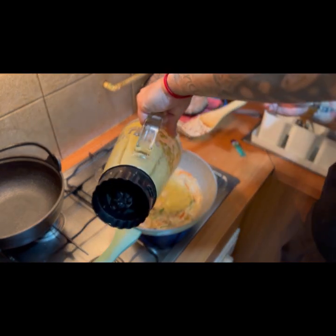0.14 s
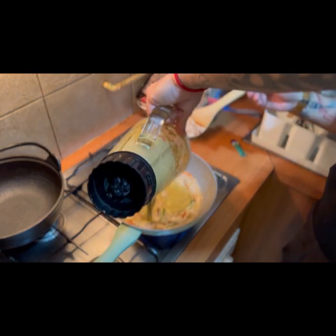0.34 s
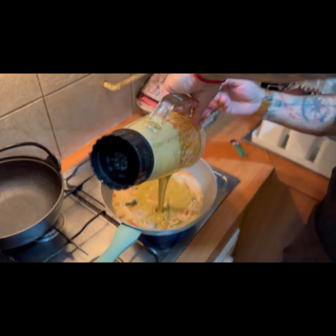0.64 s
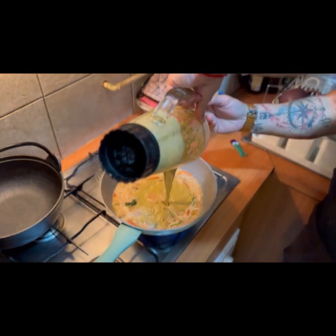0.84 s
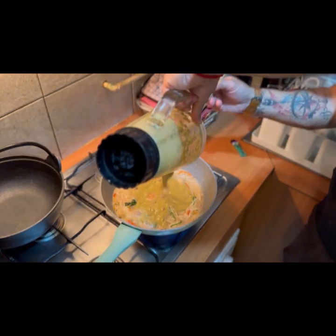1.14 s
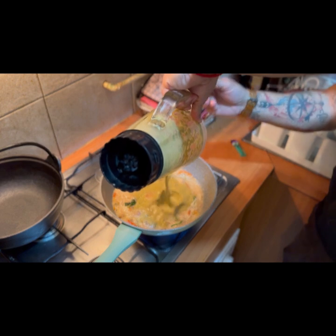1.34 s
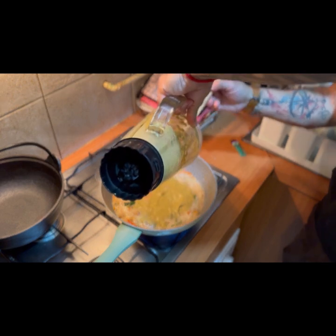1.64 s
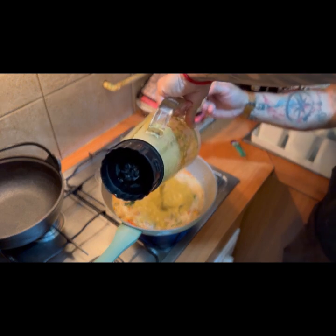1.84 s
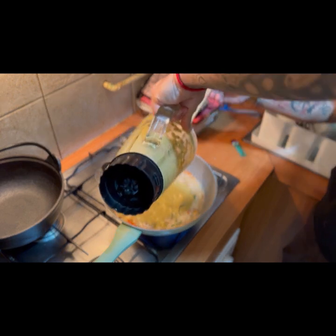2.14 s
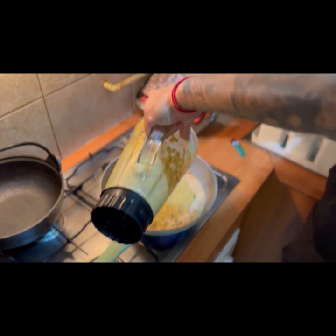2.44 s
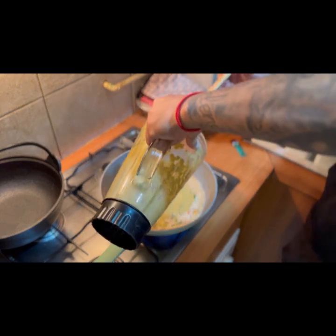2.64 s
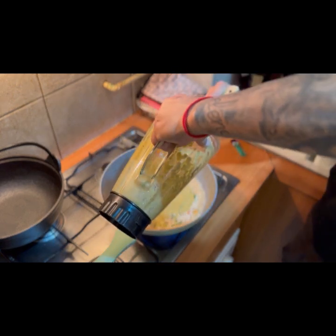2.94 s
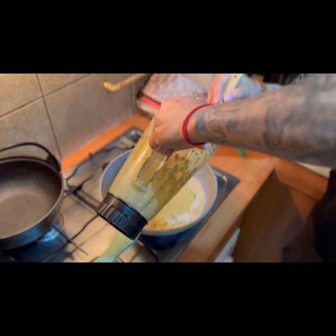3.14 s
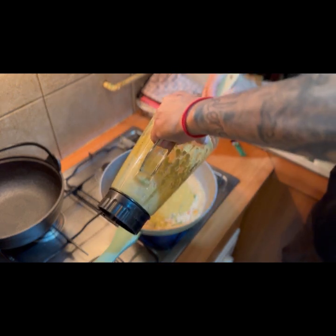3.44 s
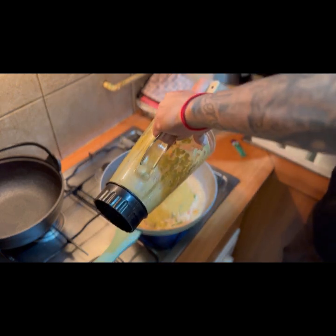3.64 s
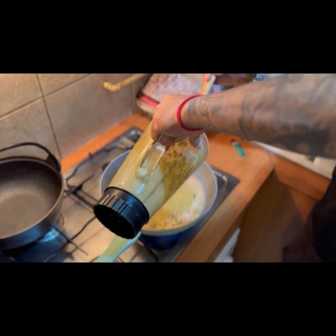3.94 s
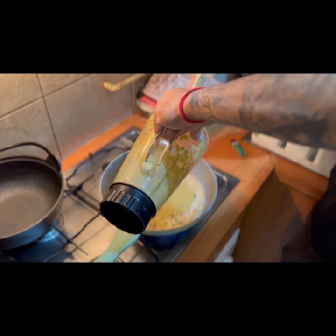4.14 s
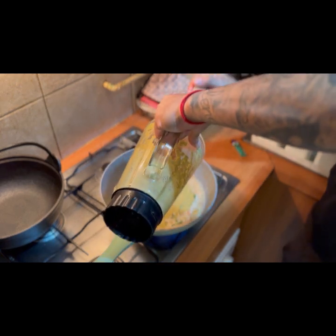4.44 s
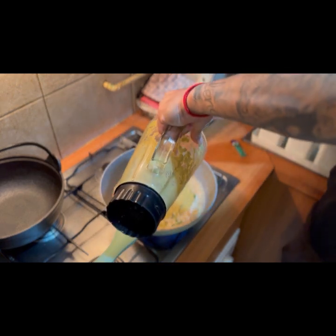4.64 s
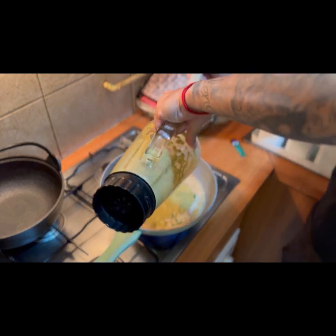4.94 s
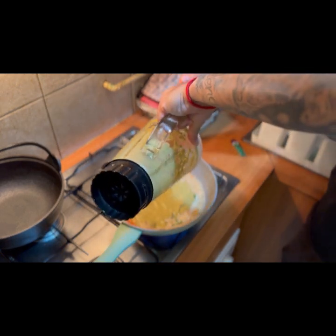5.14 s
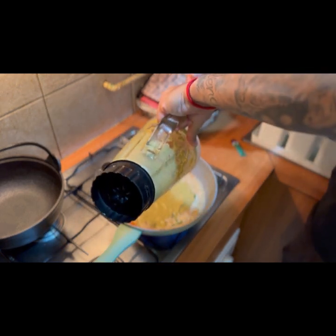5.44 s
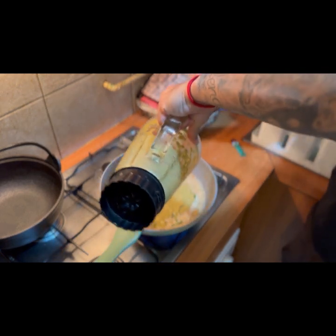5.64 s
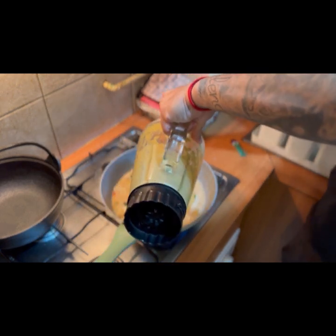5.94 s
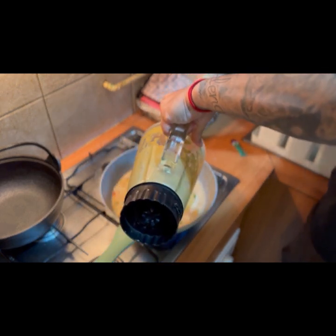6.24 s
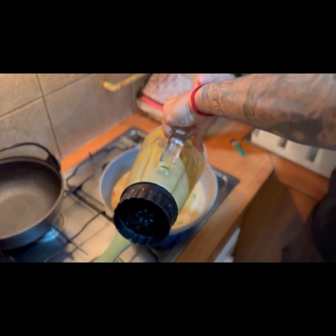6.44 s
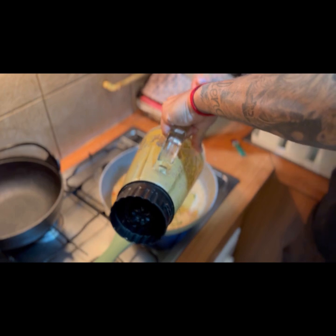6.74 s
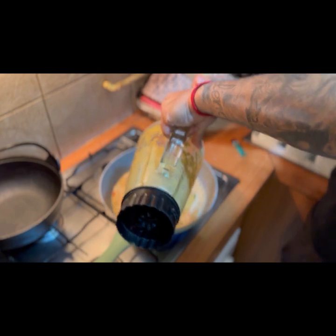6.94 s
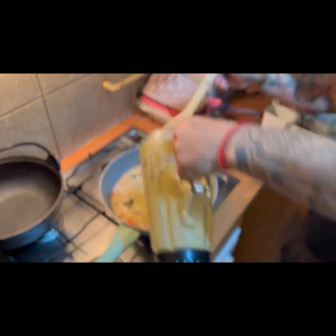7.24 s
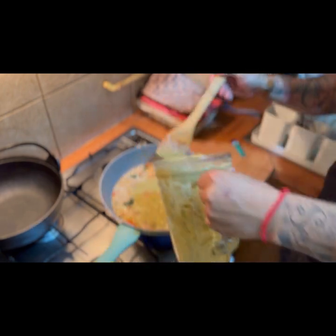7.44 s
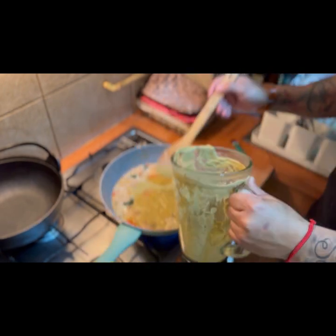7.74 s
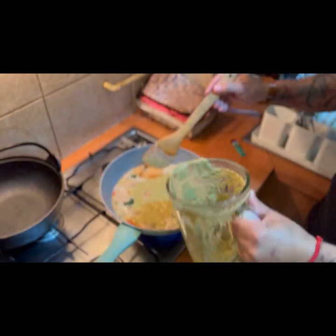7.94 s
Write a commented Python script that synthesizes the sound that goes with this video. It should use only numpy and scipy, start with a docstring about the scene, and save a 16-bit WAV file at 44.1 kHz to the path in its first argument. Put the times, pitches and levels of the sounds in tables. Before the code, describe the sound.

Close to a stereo microphone, a wooden spoon taps and rattles around a glass blender jar coated in thick sauce. The knocks come in irregular bunches, hollow and briefly ringing, brighter in the middle and boomier later, then die away near the end. Underneath, a pan hisses quietly with a few tiny spits and a fridge hums. The small tiled kitchen adds a short echo.

```python
"""A pan simmers softly and a fridge hums near a stereo microphone in a small tiled kitchen.
Half a second in, a wooden spoon starts to knock and bounce inside a sauce-coated glass jar.
Each knock booms in the jar's hollow and rings its sauce-damped glass, with a clack, a crack and
a thump at the contact. The tiles send a short echo back, and the pan spits three times."""
import sys
import numpy as np
from scipy import signal
from scipy.fft import rfft, irfft
from scipy.io import wavfile
from scipy.ndimage import uniform_filter1d

SR = 44100
rng = np.random.default_rng(int(sys.argv[2]) if len(sys.argv) > 2 else 0)


def log_audio(samples):
    """Write samples as a 16-bit WAV file to the path given in sys.argv[1]."""
    # one column per channel
    frames = np.atleast_2d(samples).T
    # limit to full scale, then quantise
    limited = np.clip(frames, -1, 1)
    pcm = np.round(limited * 32767).astype(np.int16)
    wavfile.write(sys.argv[1], SR, pcm)


N = 356627

def gain_of(db):
    return 10 ** (np.asarray(db) / 20)

def at_hz(curve, hz):
    f, value = np.transpose(curve)
    return np.interp(np.log(hz + 1), np.log(f + 1), value)

def at_time(curve, s):
    return np.interp(s, *np.transpose(curve))

def add(mix, s, sound):
    part = mix[:, round(s * SR):][:, :sound.shape[1]]
    part += sound[:, :part.shape[1]]

def coloured(x, spectrum):
    size = x.shape[-1]
    return irfft(rfft(x) * gain_of(at_hz(spectrum, np.fft.rfftfreq(size, 1 / SR))), size)

def topped(x, db):
    """Scales a sound so that its loudest 4 ms have this level."""
    return gain_of(db) * x / np.sqrt(uniform_filter1d((x ** 2).mean(0), size=176).max() + 1e-20)

def burst(t, spectrum, decay_s, shared):
    """A short puff of coloured noise, partly shared by both sides of the microphone."""
    noise = rng.standard_normal((3, len(t)))
    envelope = np.exp(-(t / decay_s) ** 1.09) * (1 - np.exp(-(t / 0.0017) ** 2))
    return coloured(noise[:2] + shared * noise[2], spectrum) * envelope

# Pan and room tone at the microphone. Each row: frequency in Hz, relative level in dB.
SIMMER_SPECTRUM = [(35, -36.5), (60, -11), (76, -19.5), (149, -0.5), (297, -3), (346, -8), (705, -3.5),
                   (895, -10), (1130, -5), (1500, -11.5), (2000, -6.5), (2450, -8.5), (3050, -13),
                   (4500, -15.5), (5200, -23), (10500, -45.5), (13700, -69.5), (22000, -120)]
# The swell of the hiss. Each row: time in seconds, gain in dB.
SIMMER_SWELL = [(0.0, 1.5), (0.85, 2), (1.93, 0), (3.2, -0.5), (3.42, 1), (3.78, 0), (7.18, -1), (8.09, 0)]
# Stereo width. Each row: frequency in Hz, left-right correlation.
SIMMER_LIKENESS = [(60, 0.67), (140, 0.96), (330, 0.9), (780, 0.16), (1830, -0.047), (4290, -0.083),
                   (10100, -0.18)]
# The lean to the left. Each row: frequency in Hz, left minus right in dB.
SIMMER_LEAN = [(60, 8.5), (140, 0.5), (330, 1.2), (780, 1), (1830, 5.1), (4290, 2.9), (10100, 2.7)]

def simmer(level_db=-55):
    """Room tone and the soft hiss of the pan: noise with drifting patches."""
    frames, hz = N // 256 + 5, np.fft.rfftfreq(1024, 1 / SR)
    a, b, c, d, patches = rng.standard_normal((frames, 513, 5)).T
    left, unrelated = a + 1j * b, c + 1j * d
    patches = uniform_filter1d(uniform_filter1d(patches, size=10, axis=0), size=12, axis=1)
    patches /= np.sqrt(np.mean(patches ** 2))
    swell_db = at_time(SIMMER_SWELL, np.arange(frames) * 256 / SR)
    likeness = at_hz(SIMMER_LIKENESS, hz)[:, None]
    spectra = np.array([left, likeness * left + np.sqrt(1 - likeness ** 2) * unrelated])
    hiss_share = np.clip(hz / 1500, 0, 1)[:, None]  # the low room tone barely swells
    spectra *= gain_of(at_hz(SIMMER_SPECTRUM, hz)[:, None] + 1.3 * patches + hiss_share * swell_db)
    spectra *= gain_of(np.array([.5, -.5])[:, None, None] * at_hz(SIMMER_LEAN, hz)[:, None])
    sound = signal.istft(spectra, nperseg=1024, noverlap=768)[1][:, :N]
    return gain_of(level_db) * sound / np.sqrt(np.mean(sound.mean(0) ** 2))

# The fridge nearby, dead centre. Each row: harmonic number, rms level in dB about which it wavers.
HUM_HARMONICS = [(1, -73), (3, -70), (4, -76), (5, -76), (6, -77), (10, -77), (12, -80), (14, -80)]

def fridge(hum_hz=49.3):
    """Steady tones of a compressor, the upper ones wavering in level."""
    t = np.arange(N) / SR
    hum = np.zeros(N)
    for harmonic, db in HUM_HARMONICS:
        hz = harmonic * hum_hz
        waver_db = .012 * hz * np.interp(t, np.linspace(0, t[-1], 90), rng.uniform(-1, 1, 90))
        hum += np.sqrt(2) * gain_of(db + waver_db) * np.sin(2 * np.pi * (hz * t + rng.random()))
    return hum

# The jar's hollow among the tiles. Each row: frequency in Hz, t60 in seconds, left gain, right gain.
# The sign tells which side of a node the microphone is on.
HOLLOW_MODES = [(388, 0.28, 0.078, 0.041), (432.4, 0.17, -0.14, -0.32), (457.3, 0.36, 0.056, 0.2),
                (462.3, 0.11, 0.4, 0.92), (486, 0.39, 0.15, 0.036), (517.7, 0.15, 0.21, -0.42),
                (554.2, 0.17, -0.24, -0.016)]
# The jar tilts. Each row: time in seconds, pitch in Hz that weights the modes.
HOLLOW_PITCH = [(0.5, 489), (1.5, 457), (3.0, 464.6), (3.6, 467), (4.2, 451), (5.5, 455.5), (7.0, 439)]

def boom(t, s):
    """The hollow's modes start together; opposite signs make the boom swell, hold and then beat."""
    hz, t60, *sides = (c[:, None] for c in np.transpose(HOLLOW_MODES))
    share, slip = rng.standard_normal((2, len(HOLLOW_MODES), 1))
    tilt_db = 1.35 * np.log2(hz / 457) * (at_time(HOLLOW_PITCH, s) - 457)
    waves = gain_of(tilt_db + 1.5 * share - 60 * t / t60) * np.sin(2 * np.pi * hz * t + .3 * slip)
    return np.sum(sides * waves, axis=1) * (1 - np.exp(-(t / 0.0012) ** 2))

# The glass at the microphone. Each row: frequency in Hz, relative level in dB, t60 in seconds,
# left minus right in dB, lead of the left side in radians.
BELLY_MODES = [(1020, 0, .1, 2, .5), (1070, 0, .13, 2, 1), (1125, 0, .12, 1, -1), (1168, 0, .21, -2, 2),
               (1210, -1, .1, 0, 2), (1280, -2, .1, 1, -1), (1360, -3, .09, 1, 2)]
WALL_MODES = [(1522, 0, .1, 0, 1), (1670, 0, .08, 0, -2), (1720, 0, .16, 0, -1), (1775, 0, .14, 0, -2),
              (1850, 0, .12, 0, 1), (1900, 0, .16, 2, -1), (1940, 0, .14, -1, .4), (2105, 0, .11, 0, 2),
              (2278, 0, .12, 0, .3), (2480, 0, .12, 0, -2)]
RIM_MODES = [(2785, 0, .21, 0, 2), (2830, -2, .12, 1, .6), (3070, -3, .1, 0, -1), (3160, -3, .1, 0, 2),
             (3360, -1, .13, 1, -2)]
# The rim rings higher with the spoon near the tipped-up mouth. Each row: time in seconds, pitch in Hz.
RIM_PITCH = [(2.6, 2800), (2.8, 3340), (3.05, 3150), (3.65, 3180), (3.9, 2770)]

def glass(t, s, belly_db, belly_hz, wall_db, wall_hz, rim_db, loss_db_per_s):
    """Belly, wall and rim ring at once, damped by the sauce on them."""
    damping = gain_of(-loss_db_per_s * t)
    belly = damping * ring(BELLY_MODES, t, belly_hz, db_per_octave=230, rise_s=0.00048)
    wall = damping * ring(WALL_MODES, t, wall_hz, db_per_octave=240, rise_s=0.00071)
    rim = damping * ring(RIM_MODES, t, at_time(RIM_PITCH, s), db_per_octave=140, rise_s=0.00044)
    return topped(belly, belly_db) + topped(wall, wall_db) + topped(rim, rim_db)

def ring(modes, t, struck_hz, db_per_octave, rise_s):
    """Dying modes; those near the pitch of the struck spot ring most."""
    hz, db, t60, pan_db, lead = (c[:, None] for c in np.transpose(modes))
    share, start, slip = rng.standard_normal((3, len(modes), 1))  # no two blows are alike
    db = db - np.minimum(db_per_octave * abs(np.log2(hz / struck_hz)), 17) + 2 * share
    fade = gain_of(db - 60 * t / t60) * (1 - np.exp(-(t / rise_s) ** 2))
    phase = 2 * np.pi * hz * t + start
    lead = lead + 0.85 * slip
    sides = [gain_of(side * pan_db) * fade * np.sin(phase + side * lead) for side in (.5, -.5)]
    return np.sum(sides, axis=1)

# The spoon's dull wood. Each row: frequency in Hz, relative level in dB.
CLACK_SPECTRUM = [(600, -36), (900, 4.5), (1300, 8.5), (1600, 4), (2500, 13), (3300, 6.5), (4200, -56)]

def clack(t, belly_db, wall_db, rim_db, wood_db):
    """The wood's short knock follows the colour and strength of the blow."""
    tint = [(1150, belly_db), (2000, wall_db), (3000, rim_db)]
    corners_hz = sorted(hz for hz, _ in [*CLACK_SPECTRUM, *tint])
    spectrum = [(hz, at_hz(CLACK_SPECTRUM, hz) + at_hz(tint, hz)) for hz in corners_hz]
    glass_db = 10 * np.log10(np.mean(gain_of([belly_db, wall_db, rim_db]) ** 2))
    return topped(burst(t, spectrum, decay_s=0.014, shared=.7), glass_db + wood_db)

# Wood on glass, and its thin top. Each row: frequency in Hz, relative level in dB.
CRACK_SPECTRUM = [(2800, -18.5), (3500, 3.5), (4200, 1), (5000, -3.5), (6200, -19), (7200, -64)]
SHEEN_SPECTRUM = [(5800, -28.5), (6600, 5), (7500, -5.5), (9000, -12), (10500, -34.5)]
# Hardness of the contact. Each row: time in seconds, crack over the blow's wall level in dB.
HARDNESS = [(0.5, -15.5), (2.0, -20), (3.0, -13.5), (3.7, -13), (4.05, -14), (4.3, -14), (5.2, -22.5),
            (7.0, -22.5)]

def crack(t, s, wall_db):
    """Wood meets glass; harder cracks are brighter."""
    crack_db = wall_db + at_time(HARDNESS, s)
    sheen_db = crack_db - 22 + 0.6 * (crack_db + 30.5)
    body = topped(burst(t, CRACK_SPECTRUM, decay_s=0.019, shared=0.47), crack_db)
    return body + topped(burst(t, SHEEN_SPECTRUM, decay_s=0.013, shared=0.38), sheen_db)

# The thump, centred on the microphone. Each row: frequency in Hz, relative level in dB.
THUMP_SPECTRUM = [(100, -35.5), (160, -1), (300, 10), (600, 18.5), (850, 15), (1200, -42.5)]

def thump(t, boom_db, belly_db, wood_db):
    """The dull push at contact; woody blows push more."""
    level_db = (boom_db + belly_db) / 2 - 9 + 0.29 * wood_db
    return topped(burst(t, THUMP_SPECTRUM, decay_s=0.0065, shared=11.0), level_db)

# Firm blows in the jar. Each row: start in seconds, boom in dB, belly in dB, its pitch in Hz, wall in dB,
# its pitch in Hz, rim in dB, wood over ring in dB. Glass levels are before the blend with the wood.
KNOCKS = [(0.5343, -44.5, -42, 980, -69.5, 1500, -72, 14), (0.6657, -39, -43, 1100, -32.5, 1880, -51, -17),
          (0.8385, -36.5, -20, 1147, -21.5, 1913, -31, 2.5), (0.9412, -44, -35, 1124, -51, 1900, -60, -12),
          (1.042, -28, -28.5, 1144, -37.5, 2550, -48, 2.5), (1.3668, -48.5, -37, 980, -63, 1860, -72, 10),
          (1.4199, -28, -29.5, 1110, -44.5, 2310, -49, 4), (1.4435, -25, -34, 1100, -34, 2000, -46, -1),
          (1.8918, -35.5, -35, 1134, -42, 1670, -68, -5), (1.9088, -27.5, -34, 1150, -37.5, 1720, -50, 3.5),
          (2.8197, -41.5, -36.5, 1066, -36, 2050, -38, 0.5),
          (2.9666, -40, -29.5, 1360, -28.5, 1773, -40, -0.5),
          (3.033, -44.5, -32, 1350, -26.5, 1707, -31, -1), (3.0692, -27, -22, 1190, -12.5, 2320, -23, 7),
          (3.0822, -55, -30.5, 1045, -36, 2170, -37, -4), (3.27, -48, -34, 1054, -28, 1768, -44, -5),
          (3.3157, -64, -47, 1000, -42, 1850, -60, -8), (3.3338, -29.5, -30, 1173, -30, 1970, -33, -1),
          (3.3432, -37, -22, 1152, -24.5, 1730, -33, 4.5), (3.3825, -41, -30, 1120, -24, 2430, -33, 8.5),
          (3.475, -35, -32, 1090, -42.5, 2230, -49.5, 1), (3.5349, -46.5, -41, 1160, -57, 2150, -71, 3),
          (3.6142, -29.5, -30, 1290, -33.5, 1800, -35, -4.5), (3.6222, -30, -34, 1190, -36, 1740, -41, -10),
          (3.6547, -33, -22, 1216, -17.5, 1795, -29, 3), (3.759, -39.5, -39, 1115, -42, 1760, -67, -7),
          (4.041, -36.5, -33.5, 1090, -33.5, 1682, -46, -7), (4.091, -35, -25.5, 1020, -32, 2555, -45, 2.5),
          (4.1702, -59, -43, 1360, -46.5, 1700, -60, -5), (4.2944, -31, -39.5, 1085, -44.5, 1940, -60, 0.5),
          (4.5064, -33, -41, 1014, -39, 1850, -51, -4), (4.5495, -28, -38, 1360, -31, 1880, -53, -4),
          (4.5642, -26, -21.5, 1248, -29.5, 1956, -36, -0.5), (5.1378, -24, -29, 1220, -30, 1720, -69, 5),
          (5.1859, -24, -42, 1116, -36, 1670, -55, -3), (5.4779, -41, -22.5, 1146, -30.5, 1955, -33, -0.5),
          (5.4877, -44, -28, 1058, -43, 2090, -45, -4), (5.8374, -22.5, -41, 1110, -33, 1980, -52.5, 2),
          (6.2065, -19, -24.5, 1140, -23, 1913, -41, 2), (6.4942, -37, -22, 1142, -27.5, 1636, -31.5, -4),
          (6.7967, -44.5, -24.5, 1164, -35, 1633, -33, -2.5), (8.059, -65, -48, 1130, -51, 1640, -75, -3)]
# Soft rebounds through the sauce, mostly boom. Each row: start in seconds, boom in dB.
REBOUNDS = [(0.7707, -48.5), (1.1109, -43.5), (1.9801, -43.5), (2.0669, -37.5), (4.365, -50), (4.7318, -45),
            (4.8555, -36.5), (4.9092, -49.5), (5.257, -37.5), (5.3133, -35.5), (5.561, -35.5),
            (5.6113, -38.5), (5.9066, -39), (5.9781, -34.5), (6.2732, -33.5), (6.3127, -36.5),
            (6.5701, -40), (6.5997, -32), (6.6712, -50), (6.9286, -48.5), (6.9624, -47.5)]

def spoon_in_jar():
    """Every blow of the spoon, as two tracks: the hollow's booms and the strikes on the glass."""
    booms, strikes = np.zeros((2, 2, N))
    t = np.arange(9000) / SR
    soft = [(s, db, db - 21.5, 1139, db - 25, 2000, db - 30.5, -5.5) for s, db in REBOUNDS]
    for s, boom_db, belly_db, belly_hz, wall_db, wall_hz, rim_db, wood_db in KNOCKS + soft:
        # Sauce on the struck spot: boomy or woody blows die sooner.
        loss_db_per_s = max(13 * (boom_db - belly_db + 11.5) + 8.6 * wood_db, 0)
        ringing = glass(t, s, belly_db, belly_hz, wall_db, wall_hz, rim_db, loss_db_per_s)
        wood = clack(t, belly_db, wall_db, rim_db, wood_db)
        blend = (ringing + wood) / np.sqrt(1 + gain_of(2 * wood_db))
        add(strikes, s, blend + crack(t, s, wall_db) + thump(t, boom_db, belly_db, wood_db))
        add(booms, s, topped(boom(t, s), boom_db))
    return booms, strikes

# The small kitchen's decay. Each row: frequency in Hz, t60 in seconds.
KITCHEN_T60 = [(300, 0.9), (1000, 0.32), (3000, 0.25), (8000, 0.36)]
# What the tiles return to the microphone. Each row: frequency in Hz, gain in dB.
TILE_RETURN = [(300, -21), (700, -8.5), (1000, -10), (4000, -8)]

def tile_echo(sound):
    """Sparse echoes of random sign, each band dying at its own speed."""
    taps = np.zeros((2, SR // 2))
    slots = np.arange(200, SR // 2 - 20, 20)
    arrivals = slots + rng.integers(0, 20, (2, len(slots)))
    np.put_along_axis(taps, arrivals, rng.choice([-1., 1.], arrivals.shape), 1)
    hz, t, bands = signal.stft(taps, SR, nperseg=256)
    decay = gain_of(-60 * t / at_hz(KITCHEN_T60, hz)[:, None])
    tail = signal.istft(bands * decay, SR, nperseg=256)[1]
    echo = signal.fftconvolve(sound, tail / np.linalg.norm(tail[0]), axes=1)
    return coloured(echo[:, :N + N % 2], TILE_RETURN)[:, :N]

# Spits from the pan. Each row: start in seconds, level in dB.
SPITS = [(1.3445, -54), (1.3648, -46.5), (7.576, -61)]
# Their colour. Each row: frequency in Hz, relative level in dB.
SPIT_SPECTRUM = [(2000, -22), (4000, 25), (7000, 6), (9500, 1), (11000, -20)]

def pan_spits():
    """The pan spits: thin ticks of noise a few milliseconds long."""
    spits, t = np.zeros((2, N)), np.arange(1000) / SR
    for s, db in SPITS:
        add(spits, s, topped(burst(t, SPIT_SPECTRUM, decay_s=0.0041, shared=0.19), db))
    return spits

def scene():
    """The kitchen from the microphone's place; strikes and spits echo off the tiles."""
    booms, strikes = spoon_in_jar()
    sharp_sounds = strikes + pan_spits()
    return booms + sharp_sounds + tile_echo(sharp_sounds) + simmer() + fridge()

def record(dry, low_hz=42, high_hz=10700):
    """The bass cut and the band limit of the recorder."""
    bass_cut = signal.butter(6, low_hz, "high", fs=SR, output="sos")
    band_limit = signal.firwin(511, high_hz, window=("kaiser", 9), fs=SR)
    return signal.oaconvolve(signal.sosfilt(bass_cut, dry), band_limit[None], "same")

dry = scene()
out = record(dry)
log_audio(out)
```